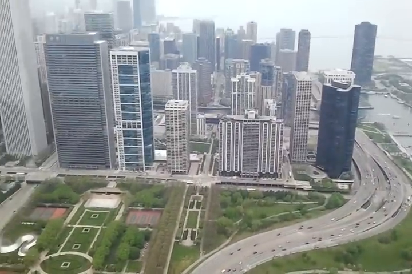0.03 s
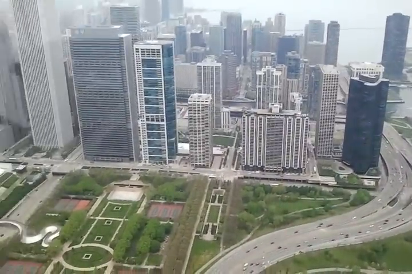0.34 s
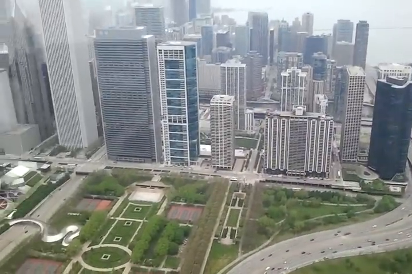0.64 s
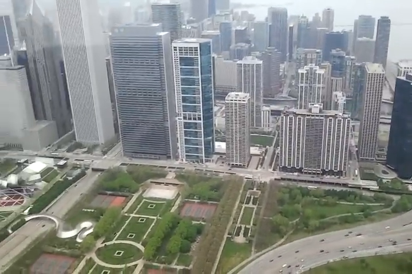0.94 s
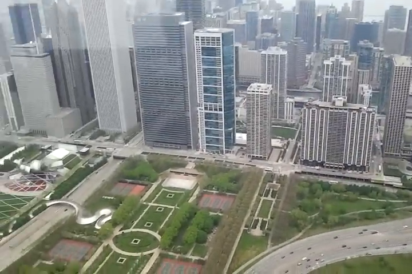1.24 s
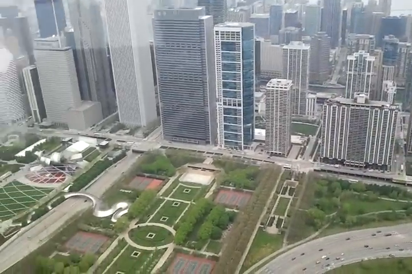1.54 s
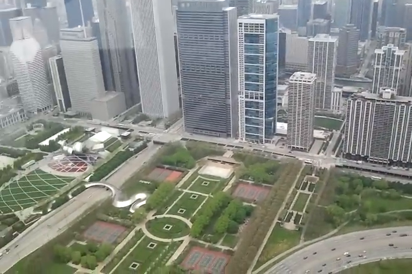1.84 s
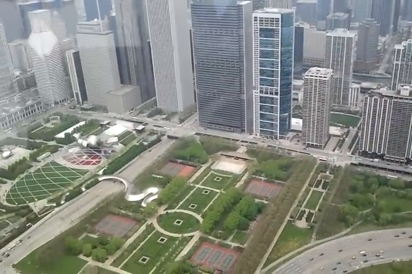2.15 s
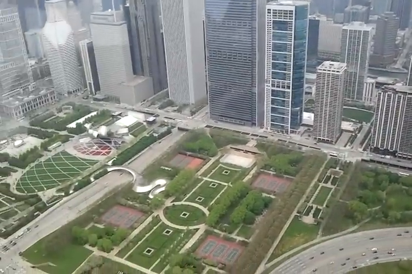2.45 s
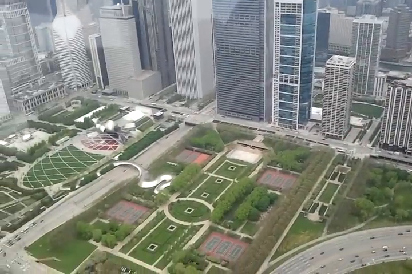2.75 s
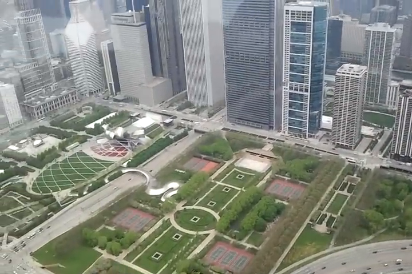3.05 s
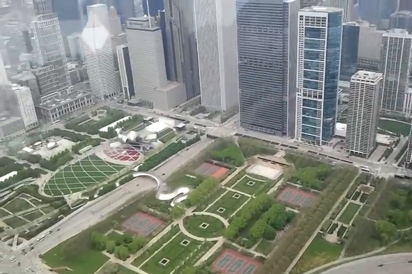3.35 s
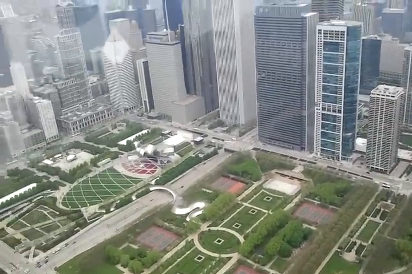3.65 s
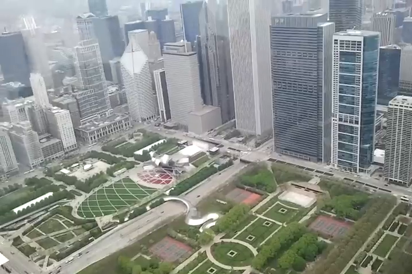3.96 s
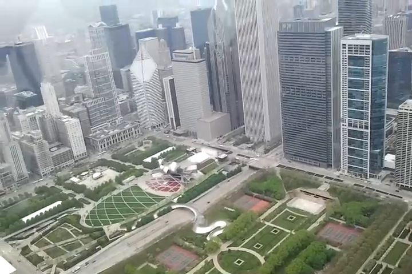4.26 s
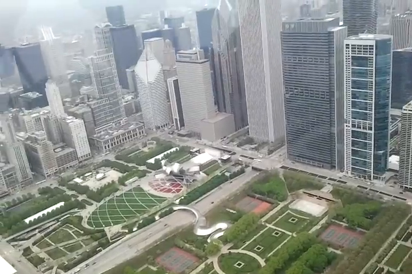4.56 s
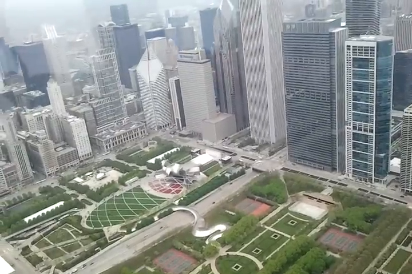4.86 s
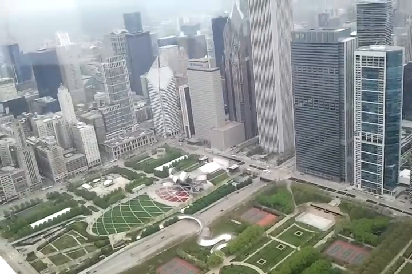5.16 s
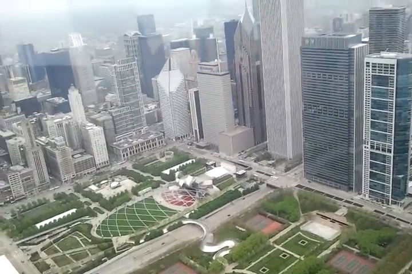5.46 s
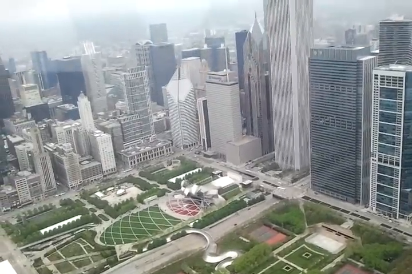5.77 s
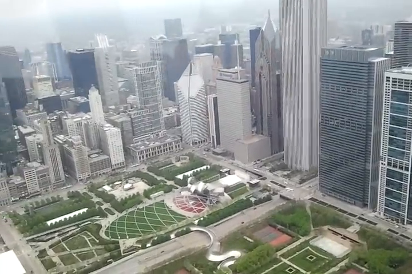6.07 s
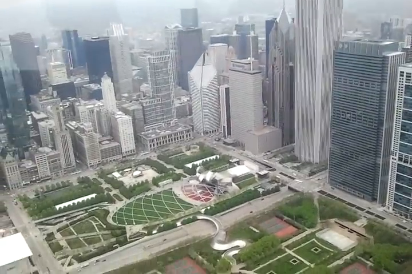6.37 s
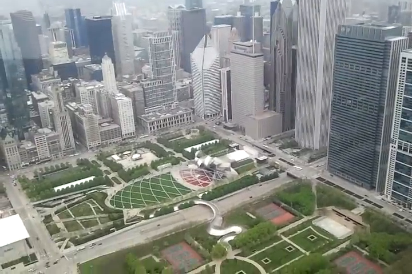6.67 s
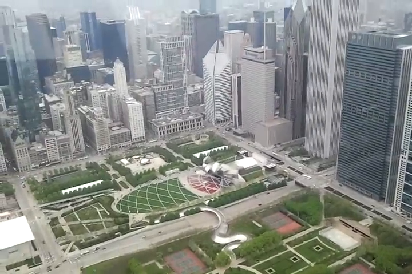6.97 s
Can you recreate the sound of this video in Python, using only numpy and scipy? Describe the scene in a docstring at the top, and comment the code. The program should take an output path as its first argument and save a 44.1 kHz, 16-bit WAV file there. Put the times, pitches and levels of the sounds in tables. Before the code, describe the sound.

Heard from inside, a small helicopter flies with a harsh, overloaded buzz, its pulsing rotor breaking into a rapid crackle at times.

```python
"""A small helicopter's piston engine in flight, heard up close in the cabin on an overloaded camera microphone.
The engine's firing tone slams the input from rail to rail; main rotor, tail rotor and cabin roar push
those edges about, so the drone rasps and throbs. In spells, each blade strikes the tip vortex of the
blade ahead, and the slap breaks through as a short crackle."""
import sys
import numpy as np
from scipy import signal
from scipy.fft import rfft, irfft, next_fast_len
from scipy.io import wavfile
from scipy.ndimage import uniform_filter1d

SR = 44100
rng = np.random.default_rng(int(sys.argv[2]) if len(sys.argv) > 2 else 0)


def output_pcm(signal):
    """Save a mono or channel-first signal as 16-bit PCM at the path in sys.argv[1].

    Samples are clipped to [-1, 1] before scaling.
    """
    pcm = np.clip(np.atleast_2d(signal).T, -1, 1) * 32767
    wavfile.write(sys.argv[1], SR, np.round(pcm).astype(np.int16))


N = 318843
TIME = np.arange(N) / SR
FIRINGS_PER_BLADE = 10  # the main rotor is geared to the engine


def undb(db):
    """Decibels to gain."""
    return np.exp(np.asarray(db) * np.log(10) / 20)


def level(x, db):
    """Set the rms level."""
    return x * undb(db) / np.sqrt(np.mean(x ** 2))


def noise(points):
    """Noise of rms 1, its spectrum drawn through (freq_hz, level_db) points."""
    hz, db = np.transpose(points)
    size = next_fast_len(N, real=True)
    bins_hz = np.maximum(np.fft.rfftfreq(size, 1 / SR), 1)
    colour = undb(np.interp(np.log(bins_hz), np.log(hz), db))
    white = rfft(rng.standard_normal(size))
    return level(irfft(white * colour, size)[:N], 0)


def wander(rate_hz):
    """A slow random curve of rms 1."""
    hold = int(SR / rate_hz)
    steps = np.repeat(rng.standard_normal(N // hold + 1), hold)
    return level(uniform_filter1d(steps, hold)[:N], 0)


def pole(x, hz, kind):
    """First-order high-pass or low-pass."""
    return signal.lfilter(*signal.butter(1, hz, kind, fs=SR), x)


def ring(x, hz, width_hz):
    """One resonance, gain 1 at its centre."""
    return signal.lfilter(*signal.iirpeak(hz, hz / width_hz, fs=SR), x)


def pulses(cycles):
    """A unit pulse each time a cycle count passes a whole number."""
    return np.diff(np.floor(cycles), prepend=np.floor(cycles[0]))


def cabin_roar(firings, db=-12.5, swish_db=0.2):
    """Air rush, gearbox and engine clatter all round the microphone, swelling slightly once a blade."""
    # spectrum of the roar: freq_hz, density_db
    roar_spectrum = [(20, -18), (70, -8.5), (150, -2.5), (300, -0.5), (600, -13.5), (1200, -23.5),
                     (2500, -30.5), (5000, -37.5), (6500, -28), (9000, -32)]
    swish = np.cos(2 * np.pi * firings / FIRINGS_PER_BLADE)
    return level(noise(roar_spectrum) * undb(swish_db * swish), db)


def tail_rotor(firings, db=-14, blades_per_firing=.5955, body_hz=95, width_hz=90):
    """A fast train of blade pulses from behind, dulled by the cabin shell."""
    buzz = ring(pulses(firings * blades_per_firing), body_hz, width_hz)
    return level(pole(buzz, 400, "low"), db)


def main_rotor(firings, db=-6.5, uneven_db=0.87):
    """Each blade passing overhead thumps the cabin and rings its resonances."""
    # cabin resonances: pitch_hz, width_hz, level_db
    cabin_modes = [(52.48, 14.2, -1.5), (71.3, 8.2, -3), (109.16, 9.36, -1.5), (204.2, 26.5, -3.5)]
    thumps = pulses(firings / FIRINGS_PER_BLADE) * undb(uneven_db * wander(22))
    boom = sum(undb(mode_db) * ring(thumps, hz, width_hz) for hz, width_hz, mode_db in cabin_modes)
    return level(boom, db)


def vortex_strike(pass_s, graze_db=-14, graze_delay_s=.004):
    """Strength and delay of a blade's slap: it strikes the tip vortex in spells, else only grazes it."""
    # spells of hard slapping: start_s, end_s, strength_db, delay_s (after the blade passes)
    spells = [(.2, .42, -2.8, .015), (3.41, 3.63, -2, -.002), (4.22, 5.25, 2.5, -.001),
              (5.53, 6.27, -2.3, 0), (6.62, 7.22, -1.5, -.004)]
    for start_s, end_s, strength_db, delay_s in spells:
        if start_s <= pass_s < end_s:
            return strength_db, delay_s
    return graze_db, graze_delay_s


def blade_slaps(firings, db=-1.5, fizz_db=-14.5, width_s=0.0041, scatter=0.11, uneven_db=0.6):
    """One slap a blade shakes the panes for a few milliseconds, never twice in quite the same way."""
    # fizz of turbulence within a slap: freq_hz, density_db
    fizz_spectrum = [(60, -7.5), (250, 12.5), (600, -1), (1300, -13.5), (3000, -30), (8000, -9.5)]
    # resonances of the window panes and shell: pitch_hz, level_db
    panes = [(300, -2), (520, -8), (900, -12.5), (1500, -15.5), (2600, -22)]
    pane_hz, pane_db = np.transpose(panes)
    fizz = undb(fizz_db) * noise(fizz_spectrum)
    passes_s = TIME[pulses(firings / FIRINGS_PER_BLADE) > 0]
    pane_draws = rng.random((len(passes_s), 2, len(panes)))
    offsets_db = uneven_db * rng.standard_normal(len(passes_s))
    slaps = np.zeros(N)
    for pass_s, offset_db, (detune, phase) in zip(passes_s, offsets_db, pane_draws):
        strength_db, delay_s = vortex_strike(pass_s)
        peak_s = pass_s + delay_s
        near = slice(*np.searchsorted(TIME, [peak_s - 10 * width_s, peak_s + 10 * width_s]))
        t = TIME[near] - peak_s
        detuned_hz = pane_hz * (1 + scatter * (2 * detune - 1))
        shake = np.sin(2 * np.pi * (np.outer(t, detuned_hz) + phase)) @ undb(pane_db)
        envelope = np.exp(-.5 * (t / width_s) ** 2)
        slaps[near] += undb(strength_db + offset_db) * envelope * (shake + fizz[near])
    return undb(db) * slaps


def engine(firings, waver_db=0.8, warble_cycles=0.0309):
    """The firing tone booms in the cabin and warbles once a blade; unequal cylinders add weak orders."""
    # engine tones: crank_order, level_db
    orders = [(3, 0), (2, -24.5), (4, -27.5), (5, -23.5), (6, -24.5), (7, -24.5), (9, -33)]
    warble = warble_cycles * np.sin(2 * np.pi * firings / FIRINGS_PER_BLADE)
    crank_angle = 2 * np.pi * (firings + warble) / 3  # six cylinders fire three times a turn
    tones = sum(undb(db) * np.sin(order * crank_angle) for order, db in orders)
    return level(tones, 0) * undb(waver_db * wander(9))


def scene(roar_db_per_load_db=0.29):
    """Pressure at the microphone, relative to the engine tone; rotors and roar grow with the load."""
    # engine speed, held nearly steady by the governor: time_s, firing_hz
    speed = [(0.0, 135.54), (0.5, 136.03), (1.2, 136.77), (2.1, 136.12), (3.2, 136.57), (3.9, 136.16),
             (4.6, 136.76), (5.3, 136.69), (6.2, 136.44), (7.2, 136.25)]
    # how hard the rotor works: time_s, load_db
    load = [(0, -1), (.35, -.5), (1.3, -2.5), (2.5, -1), (3.5, -4), (4.6, 0), (5.4, 0.1), (6, 2),
            (7.2, 2.5)]
    firing_hz = np.interp(TIME, *np.transpose(speed))
    load_db = np.interp(TIME, *np.transpose(load))
    firings = np.cumsum(firing_hz) / SR
    rotors = undb(load_db) * (main_rotor(firings) + tail_rotor(firings))
    roar = undb(roar_db_per_load_db * load_db) * cabin_roar(firings)
    return (engine(firings) + rotors + blade_slaps(firings) + roar)[None]


def record(dry, drive_db=19.5, bias=0.19, second_drive_db=2.0, trim_db=-2.5, hiss_db=-42.5,
           ceiling=0.66, full_scale=0.67, band_hz=8000, top_hz=15800):
    """The camera's input clips to a near square wave; low cuts turn its edges to spikes that clip again."""
    # smooth hiss behind the overloaded stage: freq_hz, density_db
    hiss_spectrum = [(30, -7.5), (200, 6.5), (1000, -5.5), (3000, -9), (7000, -9.5), (9000, -17.5)]
    square = np.tanh(undb(drive_db) * (dry + bias))
    spikes = pole(pole(square, 227, "high"), 3.2, "high")
    clipped = np.clip(undb(second_drive_db) * spikes, -1, 1)
    rounded = pole(pole(clipped, 238, "high"), 4140, "low")
    hiss = undb(hiss_db) * noise(hiss_spectrum)
    output_stage = np.clip(undb(trim_db) * rounded + hiss, -ceiling, ceiling)
    # the camera's sound channel is narrow
    channel = signal.firwin(75, band_hz, window=("kaiser", 5), fs=SR)
    narrowed = signal.oaconvolve(output_stage, channel[None], mode="same")
    # the tallest spikes overshoot full scale and tick faintly in the top octave
    ticking = np.clip(narrowed, -full_scale, full_scale)
    top_cut = signal.ellip(8, .2, 70, top_hz, fs=SR, output="sos")
    return signal.sosfilt(top_cut, ticking)


dry = scene()
out = record(dry)
output_pcm(out)
```